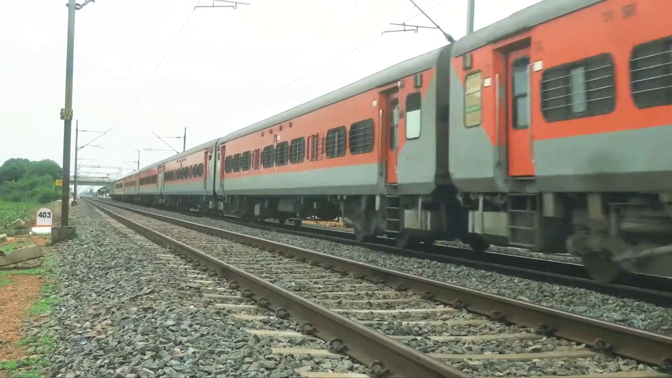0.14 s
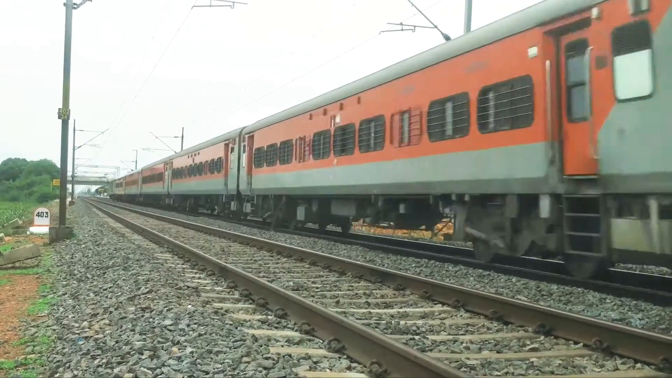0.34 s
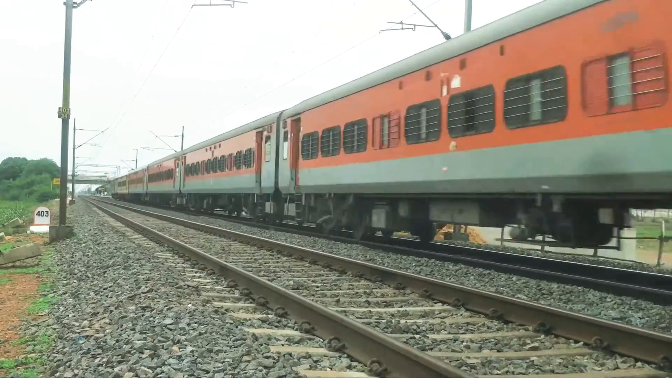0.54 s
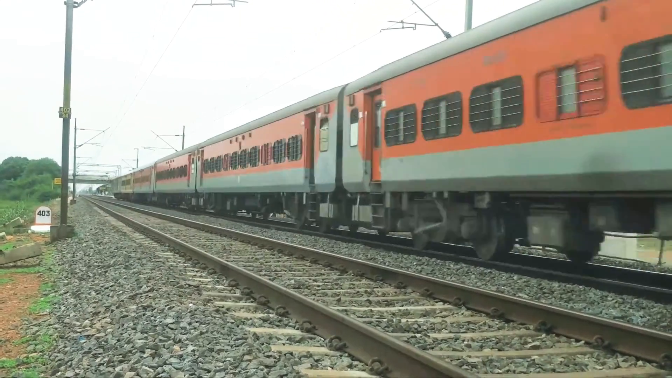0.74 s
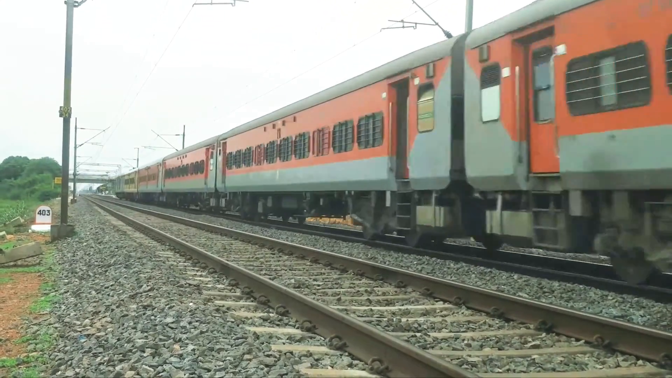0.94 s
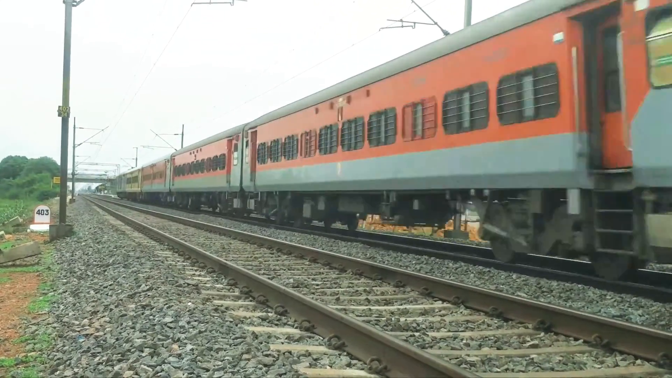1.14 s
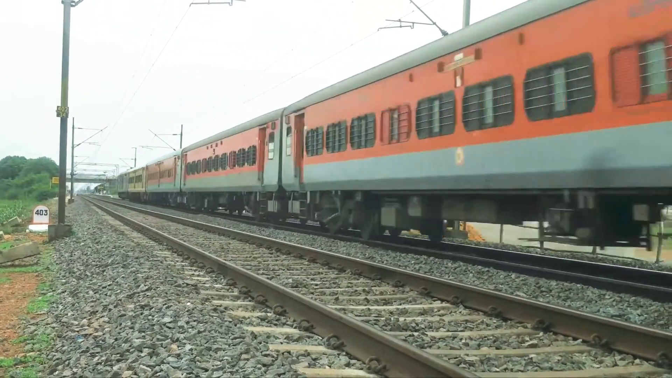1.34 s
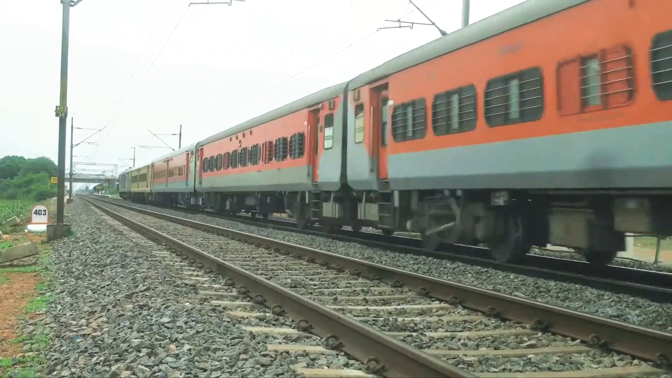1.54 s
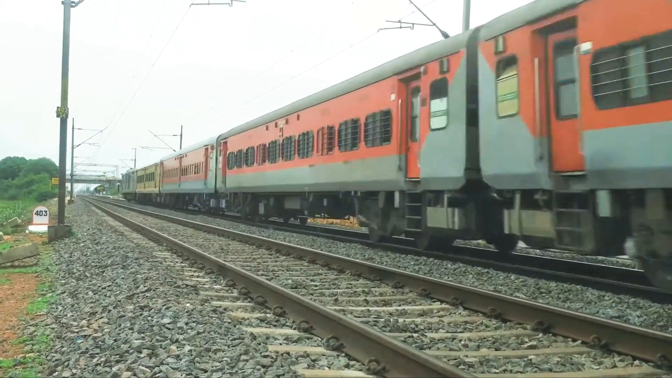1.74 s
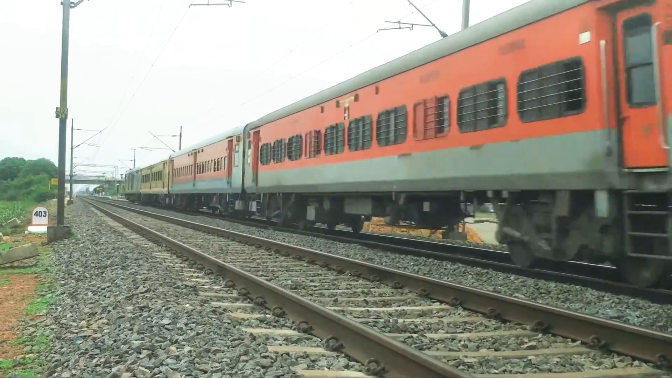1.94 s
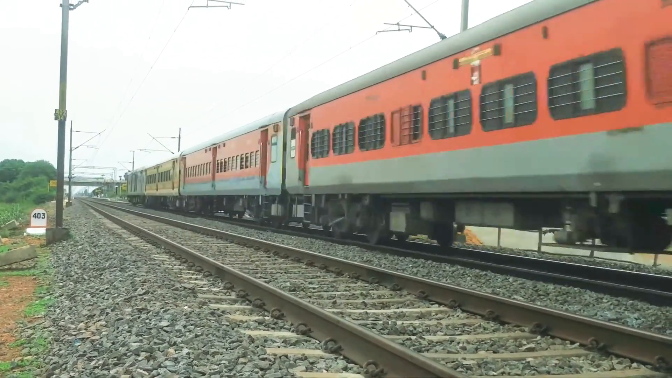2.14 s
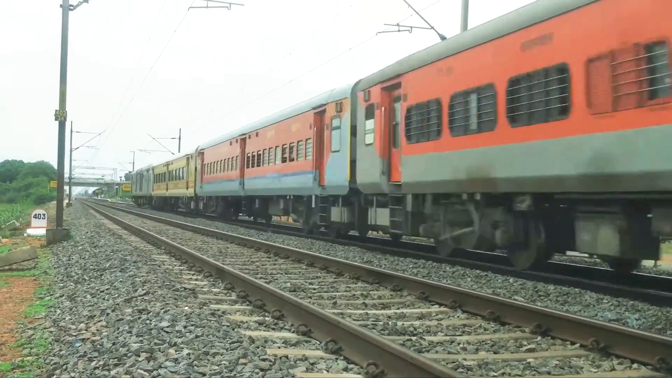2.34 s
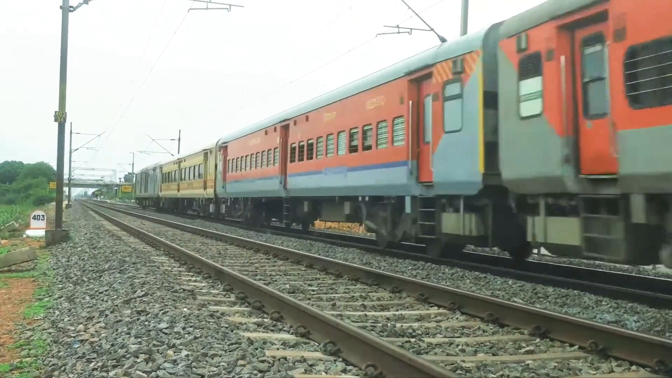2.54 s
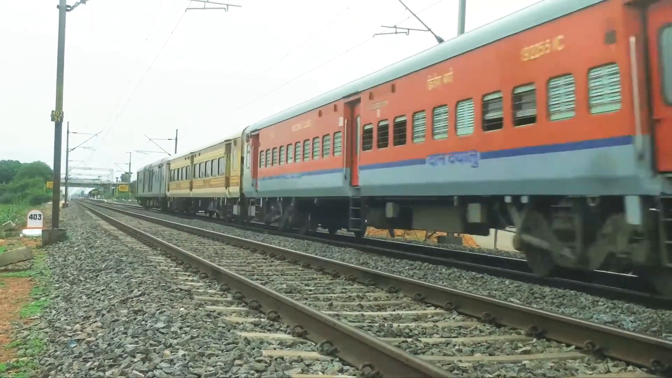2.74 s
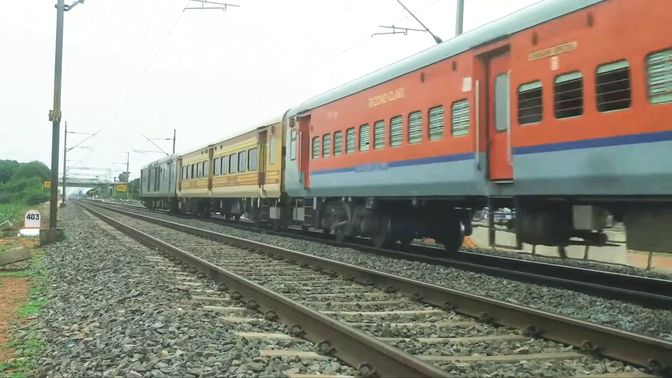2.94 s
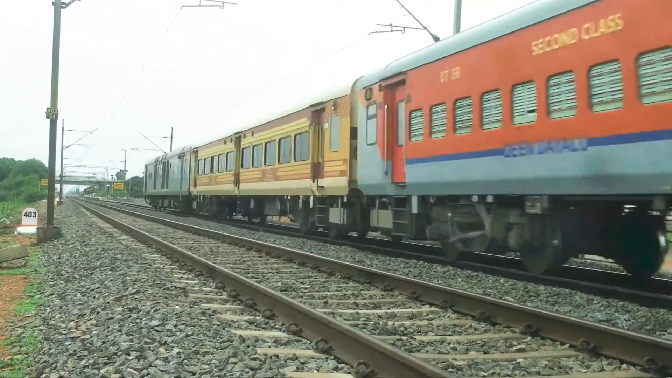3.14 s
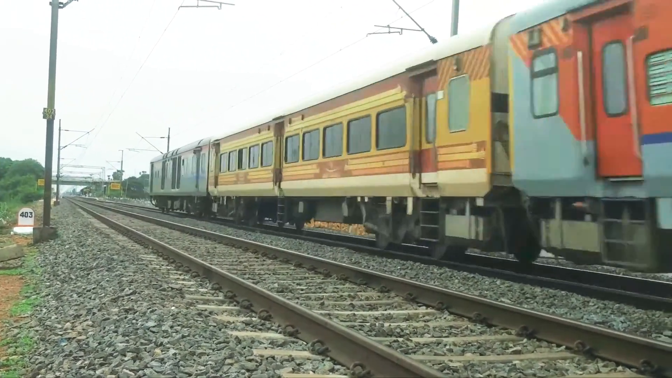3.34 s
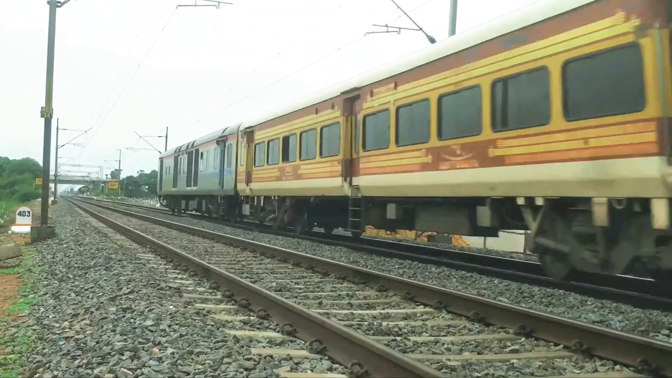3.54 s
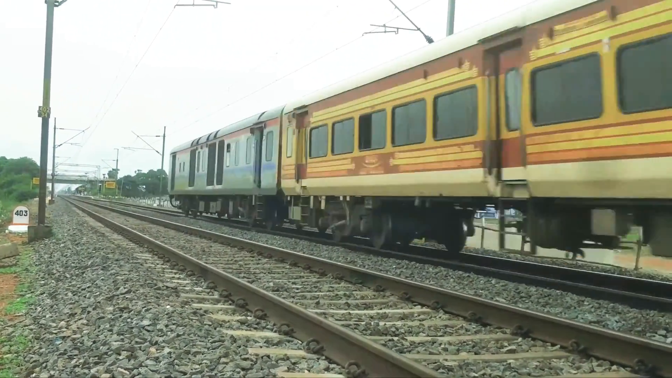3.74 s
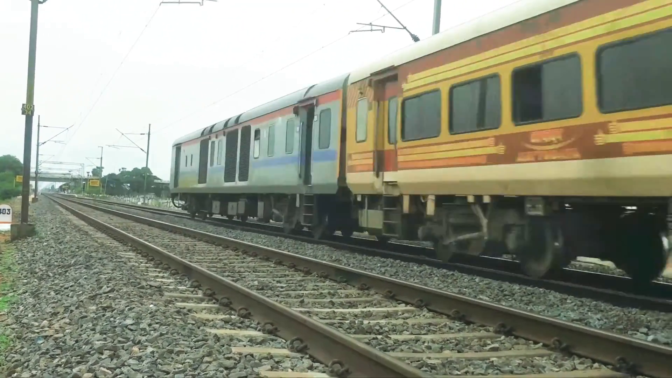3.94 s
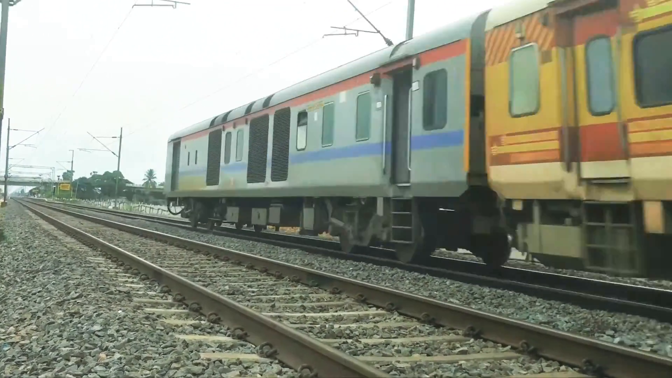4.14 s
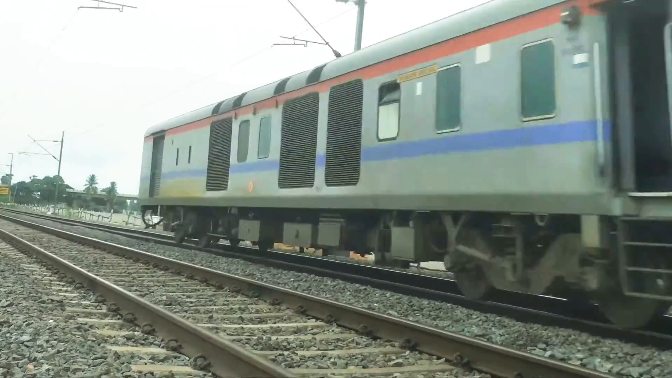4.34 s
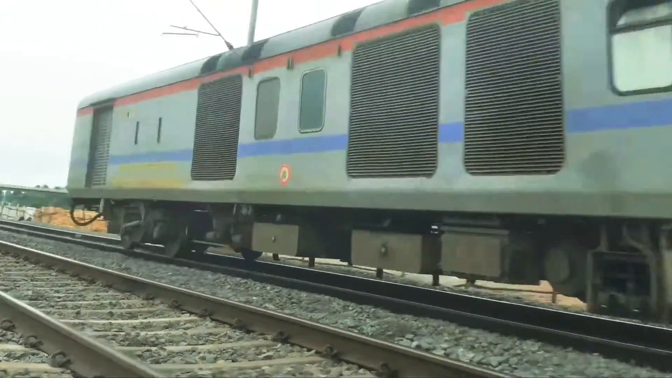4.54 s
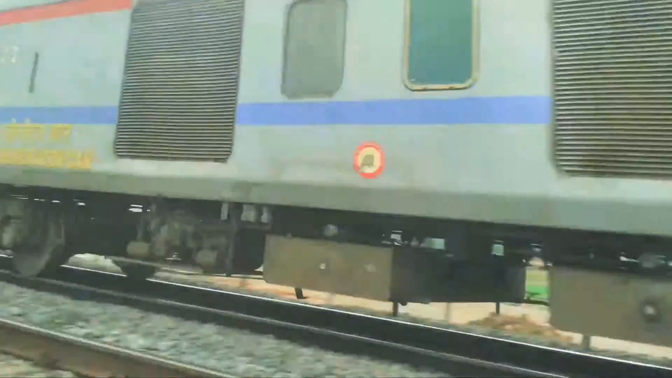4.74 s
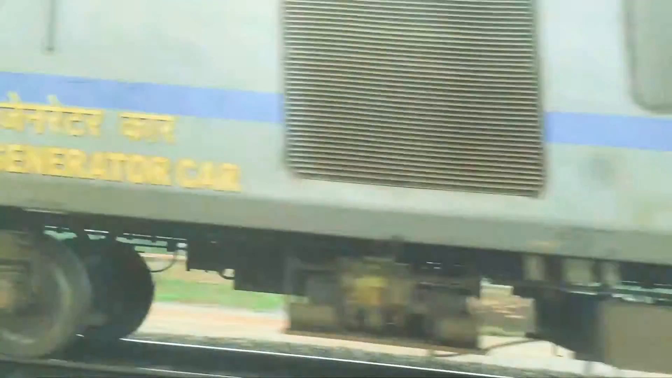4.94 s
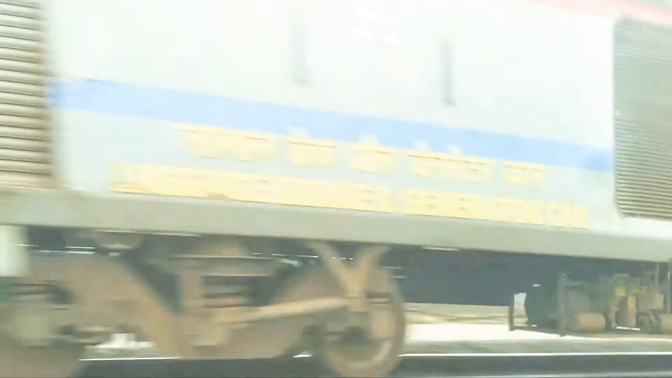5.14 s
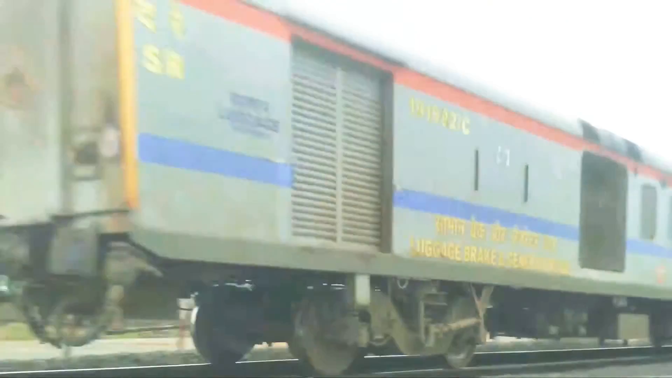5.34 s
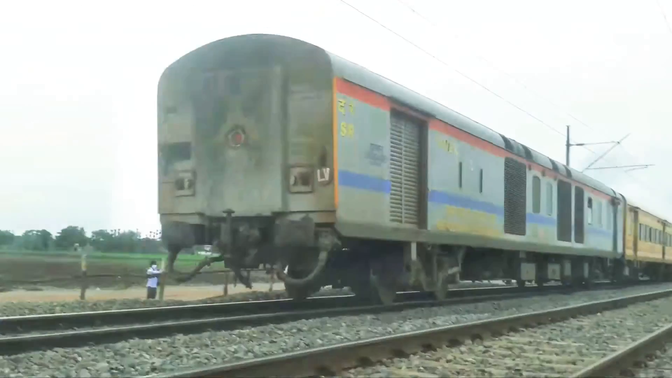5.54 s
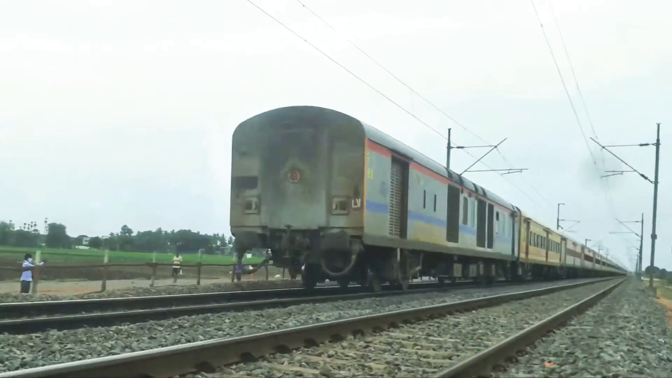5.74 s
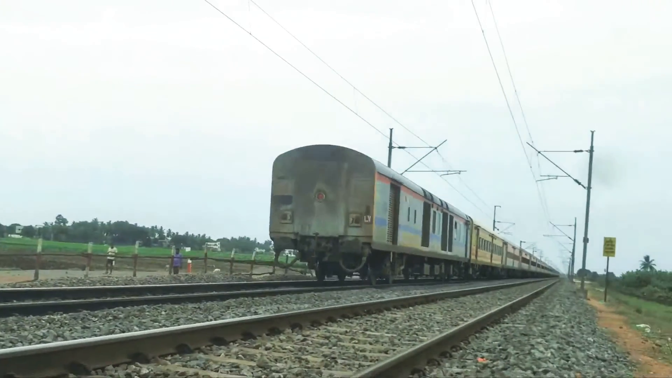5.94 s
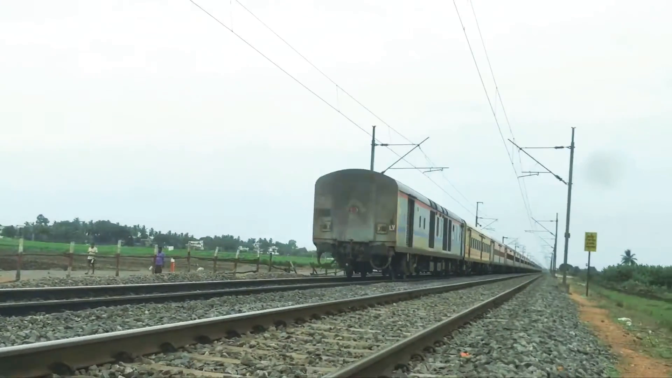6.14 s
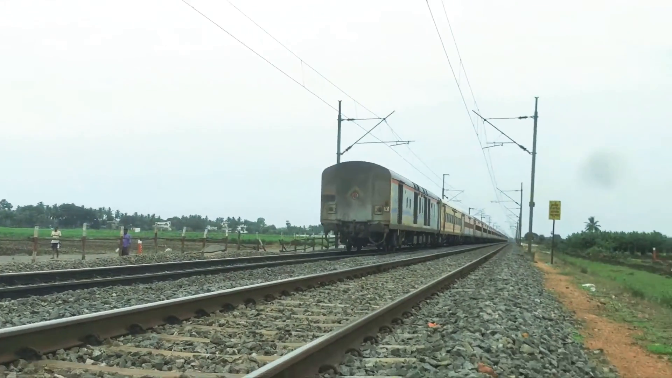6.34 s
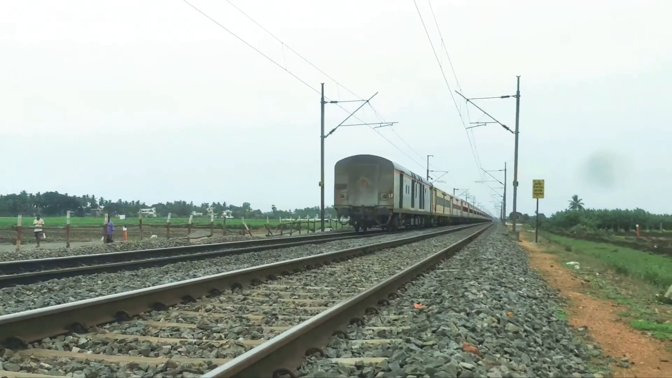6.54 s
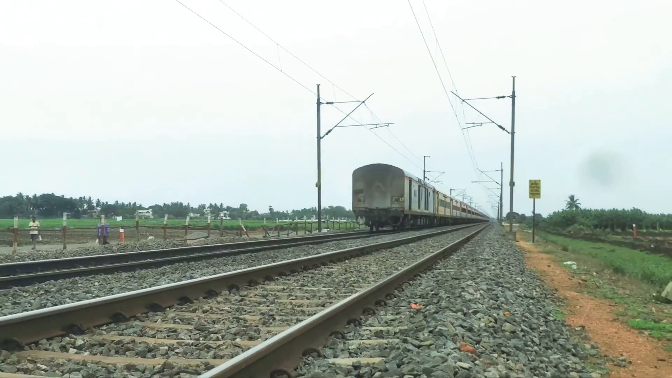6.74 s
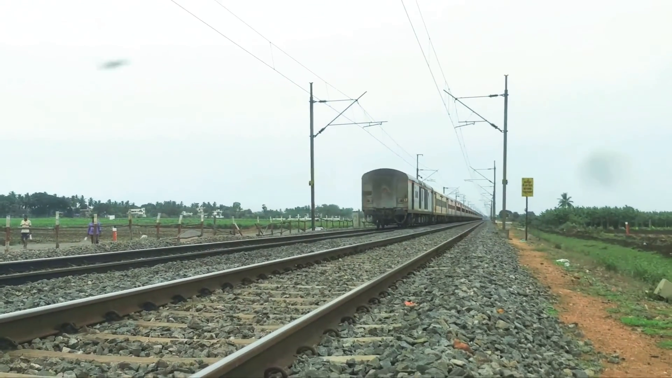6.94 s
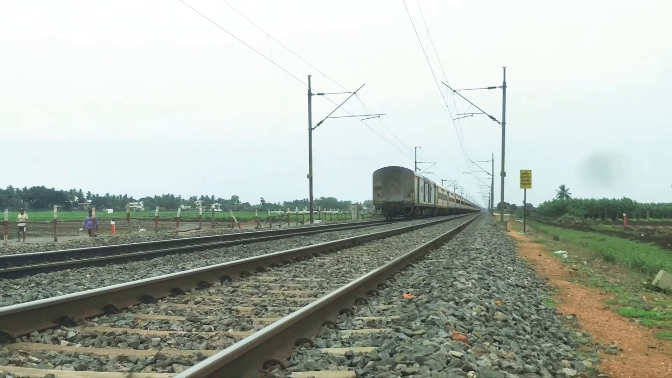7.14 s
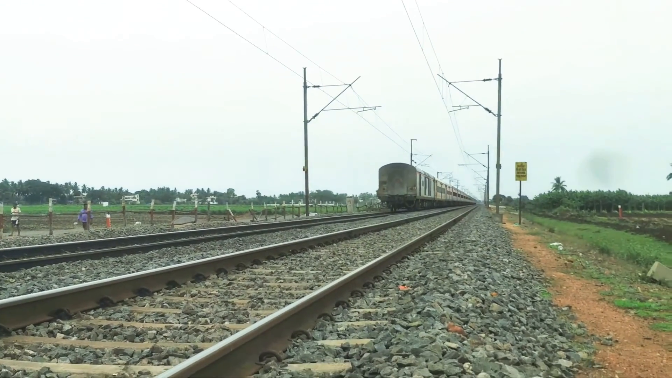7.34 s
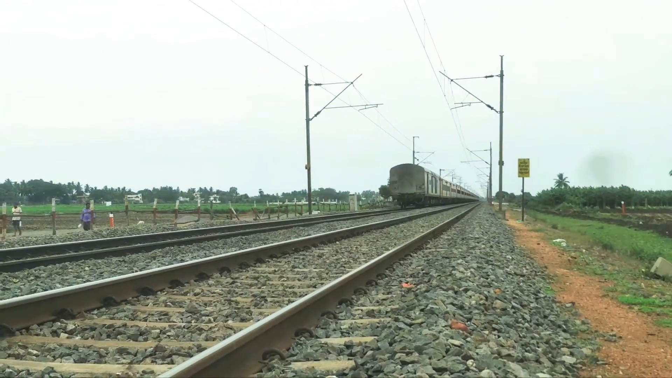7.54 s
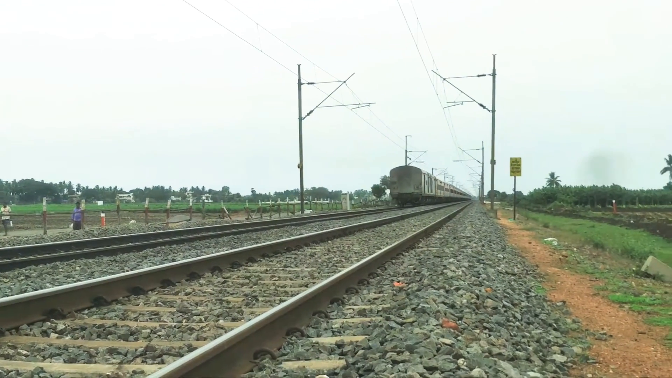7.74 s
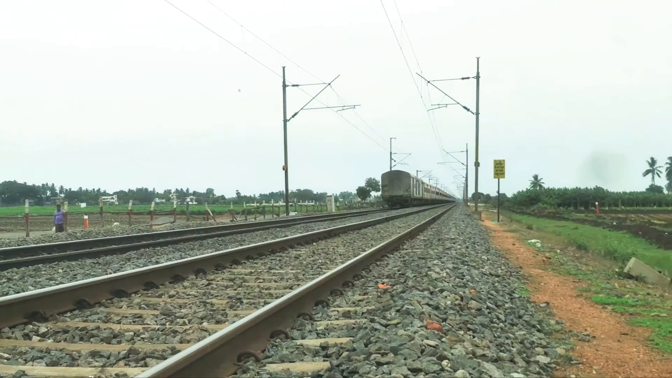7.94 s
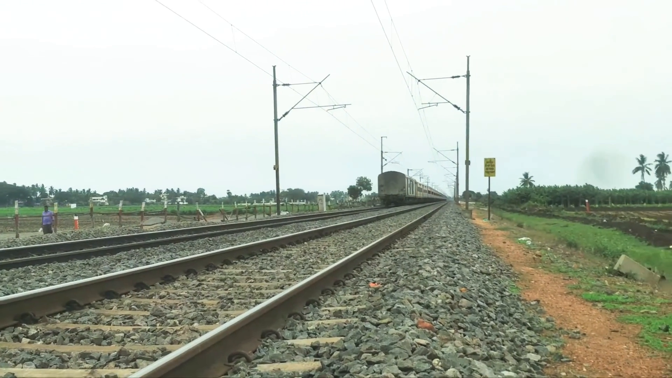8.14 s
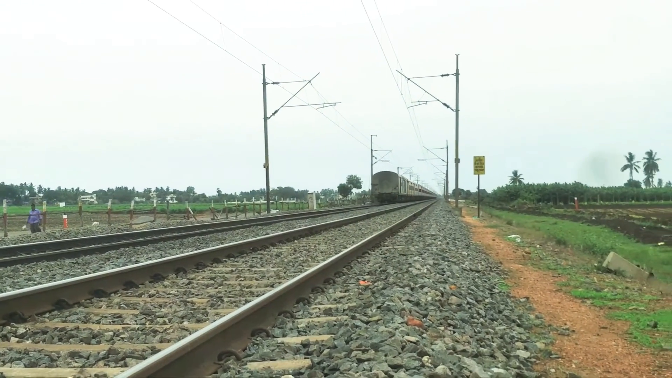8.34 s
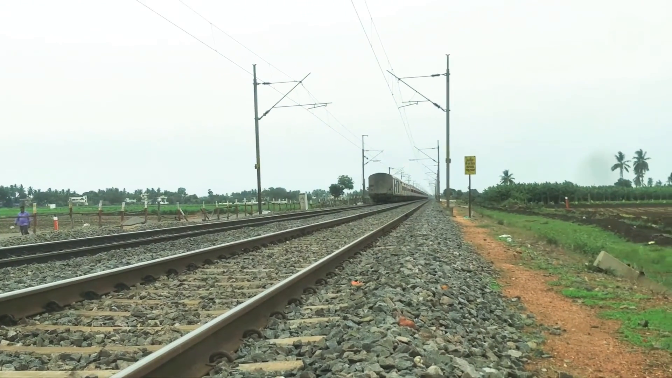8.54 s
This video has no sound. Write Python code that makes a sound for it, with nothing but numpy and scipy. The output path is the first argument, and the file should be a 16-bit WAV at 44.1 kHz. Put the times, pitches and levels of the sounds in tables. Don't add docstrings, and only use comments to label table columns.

```python
import sys
import numpy as np
from scipy import signal
from scipy.fft import rfft, irfft, next_fast_len
from scipy.io import wavfile
from scipy.ndimage import uniform_filter1d, minimum_filter1d

SR = 44100
rng = np.random.default_rng(int(sys.argv[2]) if len(sys.argv) > 2 else 0)


def digitize_waveform(pressure):
    field = np.atleast_2d(pressure).T
    bounded = np.clip(field, -1, 1)
    quanta = np.round(bounded * 32767).astype(np.int16)
    wavfile.write(sys.argv[1], SR, quanta)


def makeup_ratio(level_db):
    decades = np.asarray(level_db, float) / 20
    return 10 ** decades


N = 379241


def unit(x):
    return x / np.sqrt(np.mean(x ** 2) + 1e-20)


def along(points, hz):
    f, v = np.transpose(points)
    return np.interp(np.log(hz + 1), np.log(f + 1), v)


def share_at(points, hz):
    return np.clip(along(points, hz), 0, 1)


def curves(rows):
    s, *cols = np.transpose(rows)
    return [np.interp(np.arange(N) / SR, s, c) for c in cols]


def filtered(x, response):
    n = x.shape[-1]
    m = next_fast_len(n + 8192)
    return irfft(rfft(x, m) * response(np.fft.rfftfreq(m, 1 / SR)), m)[..., :n]


def below(hz, edge_hz):
    return 1 / (1 + (hz / edge_hz) ** 12)


# frequency in Hz, level in dB per Hz.
COLOUR = [(16, -36.5), (28, -38), (45, -16.5), (87, -11), (225, 2), (381, -12.5), (534, -11), (962, -8.5),
          (1290, -19), (1500, -15.5), (1970, -13.5), (2140, -11.5), (2640, -15), (3700, -28), (4290, -28.5),
          (5580, -73), (9440, -120)]
# frequency in Hz, share unlike at the two ports.
SCATTER = [(60, 0.0073), (250, 0.016), (700, 0.21), (1300, 0.25), (2500, 0.7), (5000, 0.85)]
SPLITS = [120, 400, 1300]
# time in seconds, level in dB.
RUMBLE_SINKS = [
    (5.3, 0),
    (6.3, -5.5),
    (8.6, -10),
]
RUMBLE_DB, RUMBLE_FOLLOWS = -22, 0.39
BOOM_LATE_S = .012


def rolling():
    direct = unit(bogies())
    x = filtered(direct, lambda f: np.sqrt(1 - share_at(SCATTER, f)))
    x = x + filtered(rng.standard_normal((2, N)), lambda f: np.sqrt(share_at(SCATTER, f)))
    boom, rail, ring = slaps(width=.02)
    fading = np.interp(np.arange(N) / SR, [5.3, 5.9], [0, -7])
    *roll, air_db = levels()
    rumble = RUMBLE_DB + RUMBLE_FOLLOWS * (roll[0] + 16) + curves(RUMBLE_SINKS)[0]
    knocked, dip = knocks()
    struck, hush = strikes()
    out = knocked + struck
    boom = np.roll(boom, round(BOOM_LATE_S * SR)) + dip
    swells = [0.06 * boom + fading, boom, rail + 0.043 * dip, 0.89 * ring + hush]
    edges = [lambda f: 0 * f] + [lambda f, e=e: below(f, e) for e in SPLITS] + [lambda f: 1 + 0 * f]
    for level, swell, lo, hi in zip([rumble, *roll], swells, edges, edges[1:]):
        band = filtered(x, lambda f: makeup_ratio(along(COLOUR, f)) * np.sqrt(np.abs(hi(f) - lo(f))))
        out = out + makeup_ratio(level + swell) * unit(band)
    out = out + flange_screech(x, ring)
    return out + contact_hiss(direct, x, ring, fading, air_db) + songs(ring)


# frequency in Hz, share the same every turn.
TREAD = [(50, .9), (300, .85), (1000, .5), (3000, .3)]
# frequency in Hz, width in Hz, level in dB.
WHEEL = [(1620, 25, -5.5), (1872, 25, -4), (2221, 11, -1.5), (2540, 6, 1.5), (3166, 50, -2), (3708, 70, -6),
         (4310, 40, -4)]


def treads(turn_hz, size, ring_db):
    n = N + 4 * SR
    loop = np.resize(rng.standard_normal(round(SR / turn_hz)), n)
    both = np.array([loop, rng.standard_normal(n)])

    def mode(f, hz, width, db):
        damping = 1j * f * width
        return makeup_ratio(db) * damping / ((hz / size) ** 2 - f * f + damping)

    def response(f):
        share = share_at(TREAD, f)
        ring = 1 + makeup_ratio(ring_db) * sum(mode(f, *row) for row in WHEEL)
        return np.sqrt([share, 1 - share]) * ring

    return filtered(both, response).sum(0)


# time in seconds, axis from the track normal in degrees.
HEADING = [
    (0, 7.4),
    (4.75, 23.5),
    (5.05, 100),
    (5.4, 116),
    (6, 123),
    (6.6, 127),
    (8.6, 130.7),
]
SPEED, GAP, PORT_S = 31, 7, 0.00052
SOUND = 343


def passing(t, heading, abeam):
    ahead = SPEED * (t - abeam)
    r = np.hypot(ahead, GAP)
    lag = PORT_S * np.cos(0.612 * np.arctan2(ahead, GAP) - np.radians(heading))
    return r, t - r / SOUND + np.outer([-.5, .5], lag)


def port_times(t, heading):
    delay = PORT_S * (1 + np.array([[.5], [-.5]]) * np.cos(np.radians(heading)))
    return np.maximum(t - delay, 0)


# seconds when abeam, sleeper boom in dB, rail in dB, wheel ring in dB, contact hiss in dB.
BOGIES = [(-.3, 0, -24, -16.5, -22), (0, -25, -61, -20.5, -36), (.33, -19.5, -24, -19.5, -53),
          (.62, -14.5, -22.5, -17, -35.5), (.9, -17, -42, -24.5, -57), (1.4, -16.5, -21.5, -19, -40),
          (1.75, -12, -19.5, -19.5, -36.5), (2.05, -15.5, -27, -18, -33.5), (2.25, -12.5, -23, -22, -37.5),
          (2.75, -26.5, -28.5, -21, -43.5), (3.2, -22.5, -28, -20.5, -41.5), (3.5, -20, -24, -20, -38),
          (3.85, -18, -29.5, -17.5, -38.5), (4.4, -14, -19.5, -17, -33.5), (4.78, -11, -22, -16.5, -32.5),
          (5.08, -14, -19.5, -16.5, -26.5), (5.33, -15.5, -30, -21.5, -36.5),
          (5.72, -34.5, -32, -40, -64.5)]


def bogies():
    t, (heading,) = np.arange(N) / SR, curves(HEADING)
    pool = [treads(hz, size, ring_db=13) for hz, size in [(10.75, 1), (10.9, .96), (10.65, 1.05)]]
    total, power = np.zeros((2, N)), np.zeros(N)
    for k, (s, _, _, db, _) in enumerate(BOGIES):
        r, sent = passing(t, heading, s)
        source = pool[k % len(pool)]
        gain = makeup_ratio(db) / r ** 1.095
        start_s = 1 + 2 * rng.random()
        total += gain * np.interp((sent + start_s) * SR, np.arange(len(source)), source)
        power += gain ** 2
    return total / np.sqrt(power)


def nearness(times, levels_db, fall):
    t = np.arange(0, N, 64) / SR
    r = np.hypot(SPEED * (t[:, None] - times), GAP)
    power = (makeup_ratio(levels_db) * (GAP / r) ** fall) ** 2
    return np.interp(np.arange(N) / SR, t, 10 * np.log10(power.sum(1)))


# fall with distance as a power, whole train far off in dB,
# its fade in dB per second, share of the drone's swells.
CARRY = [
    (1.8, -41.5, -1.1, 0.45),
    (1.8, -39.5, 2, 0.76),
    (2.2, -35, 1.98, 1.4),
    (2.2, -53, 2.5, 1.3),
]
# time in seconds, level in dB.
DRONE = [(6, -0.5), (6.85, 0), (7.08, 2), (7.3, 0.5), (7.62, 3), (7.76, 0), (8.6, -0.5)]
FAR_S = 6.5


def levels():
    t, (s, *columns) = np.arange(N) / SR, np.transpose(BOGIES)
    drone, out = curves(DRONE)[0], []
    for db, (fall, far_db, fade, share) in zip(columns, CARRY):
        far = far_db - fade * (t - FAR_S) + share * drone
        out.append(10 * np.log10(makeup_ratio(2 * nearness(s, db, fall)) + makeup_ratio(2 * far)))
    return out


# first slap in seconds, last in seconds, swells of boom, rail, ring in dB.
SLAPS = [(0.118, 0.203, -0.5, 0.5, 2.5), (0.293, 0.385, 1, 2, 2), (0.459, 0.739, 3.5, 2, 2),
         (0.857, 1.038, 8, 5.5, -1), (1.3, 1.387, 0.5, 3.5, 3.5), (1.481, 1.749, 3, 4, 3.5),
         (1.836, 2.189, 6.5, 8, 3.5), (2.287, 2.376, -0.5, 4.5, 2.5), (2.741, 2.854, -2.5, 0.5, 2),
         (2.91, 3.082, 3, 2, 2), (3.254, 3.337, -3.5, 5, 3), (3.43, 3.889, 3.5, 2.5, 0.5),
         (4.014, 4.216, 2.5, 0, 2), (4.398, 4.491, -5.5, 6, 3), (4.57, 4.85, 1, 6, 1.5),
         (4.944, 5.12, 0, 4, 3), (5.343, 5.514, 6, 6.5, 2), (5.72, 5.919, 2, -0.5, 3),
         (6.35, 7.032, 1.5, 2, 0.5), (7.248, 7.469, 2, 0.5, -1), (7.767, 7.956, 0.5, 4, 1),
         (8.27, 8.46, 2, -1, 1.5)]
TURN_S, TURN_AWAY_S, GONE_S = .092, .1, 6
SLAP_SCATTER_DB = .7


def slaps(width):
    marks = np.zeros((3, N))
    for first, last, *swell in SLAPS:
        turn = TURN_S if first < GONE_S else TURN_AWAY_S
        when = np.linspace(first, last, round((last - first) / turn) + 1)
        heights = swell + SLAP_SCATTER_DB * rng.standard_normal((len(when), len(swell)))
        marks[:, np.round(when * SR).astype(int)] = heights.T
    t = np.arange(-SR // 10, SR // 10) / SR
    hump = np.exp(-.5 * (t / np.where(t < 0, 0.4 * width, width)) ** 2)
    swell = signal.fftconvolve(marks, hump[None], mode="same", axes=1)
    return 1.48 * (swell - uniform_filter1d(swell, SR // 5, axis=1))


# time in seconds, peak in dB, sleeper pitch in Hz.
KNOCKS = [(0.026, -15, 229), (0.091, -3.5, 197), (0.12, -5, 187), (0.186, -3.5, 171), (0.325, -1, 148),
          (0.593, -1, 196), (0.638, -19, 147), (0.736, -5, 130), (0.833, -6.5, 160), (0.869, -4, 157),
          (0.962, -2, 213), (1.062, -5, 200), (1.233, -5, 186), (1.282, -6, 228), (1.472, 0, 220),
          (1.655, -1, 194), (1.752, -2, 216), (1.808, -2, 210), (1.845, -3, 285), (1.898, -3.5, 196),
          (1.989, -2.5, 195), (2.076, -11, 149), (2.197, -6, 155), (2.274, -2.5, 180), (2.372, -6, 203),
          (2.515, -5, 172), (2.579, -8, 252), (2.67, -13.5, 262), (3.247, -7, 205), (3.447, -6.5, 183),
          (3.517, -5, 248), (3.796, -4.5, 206), (3.828, -5, 178), (3.87, -4.5, 127), (4.016, -12, 155),
          (4.083, -7.5, 184), (4.287, -3.5, 250), (4.318, -4, 304), (4.367, -1.5, 252), (4.455, 0, 230),
          (4.545, -3.5, 177), (4.577, -1, 238), (4.633, 0.5, 220), (4.726, -8, 231), (4.823, -2.5, 232),
          (4.86, 3, 214), (5.023, -6, 153), (5.1, -11, 195), (5.211, -5, 165), (5.43, -6, 218),
          (5.5, -8, 163), (5.596, -7.5, 162)]
KNOCK_DB, KNOCK_RISE_S, KNOCK_T60_S = 2.5, 0.0017, 0.056
UPPER, UPPER_DB = 1.56, -9.5
LIFT_DB, LIFT_S, LIFT_LEAD_S = 10, .016, .007


def knocks():
    out, dip, (heading,) = np.zeros((2, N + SR)), np.zeros(N), curves(HEADING)
    t = np.arange(SR // 8) / SR
    for s, db, hz in KNOCKS:
        at = round(s * SR)
        u = port_times(t, heading[at])
        envelope = makeup_ratio(db + KNOCK_DB - 60 * u / KNOCK_T60_S) * (1 - np.exp(-u / KNOCK_RISE_S))
        upper = makeup_ratio(UPPER_DB) * np.sin(2 * np.pi * UPPER * hz * u)
        out[:, at:at + len(t)] += envelope * (np.sin(2 * np.pi * hz * u) + upper)
        near = np.arange(max(at - SR // 16, 0), at + SR // 16)
        dip[near] -= LIFT_DB * np.exp(-.5 * ((near / SR - s + LIFT_LEAD_S) / LIFT_S) ** 2)
    return out[:, :N], dip


# time in seconds, peak in dB, loudest wheel mode in Hz.
STRIKES = [(0.0927, 0, 2153), (0.1875, -6, 2210), (0.2204, -5, 1980), (0.2862, -1.5, 2210),
           (0.3182, -6.5, 2410), (0.4549, 0.5, 2344), (0.5087, -2.5, 2130), (0.5487, -1.5, 1483),
           (0.6404, -4.5, 2020), (0.7387, -4.5, 2030), (0.9607, -10, 1660), (1.1897, -8, 1860),
           (1.3857, -6, 1924), (1.4641, -5, 2230), (1.5594, -2.5, 2150), (1.7355, -12, 1900),
           (1.8332, -13, 1900), (1.925, -4.5, 2230), (2.0108, -9, 2040), (2.1051, -3, 2040),
           (2.1799, -4, 2320), (2.2164, -16, 2130), (2.2977, -3.5, 2070), (2.3565, -7, 1590),
           (2.7342, -24, 2400), (2.8245, -12.5, 1800), (2.9228, -5.5, 2080), (3.044, -7, 2050),
           (3.1014, -11, 1850), (3.2136, -11, 2155), (3.3348, -14, 1930), (3.4037, -13, 1860),
           (3.4236, -13, 2340), (3.6067, -6.5, 1743), (3.6995, -3.5, 2100), (3.9794, -5, 2070),
           (4.0367, -5, 2200), (4.1579, -6, 1833), (4.3131, -6, 1730), (4.341, -13, 1880),
           (4.368, -7, 2320), (4.3894, -24, 2100), (4.4184, -3, 2075), (4.4643, -6, 1800),
           (4.579, -8, 2180), (4.6628, -9, 2370), (4.6957, -3, 2110), (4.7296, -10, 2250),
           (4.806, -5, 1910), (4.8479, -4, 1890), (4.9397, 4, 1616), (5.0215, -2, 1570),
           (5.1128, -21, 2110), (5.2116, -7, 3200)]
# time in seconds, peak in dB, pitch in Hz.
RAPS = [(0.094, -12.5, 432), (0.32, -8.5, 540), (0.369, -13, 423), (0.42, -17, 560), (0.591, -10.5, 600),
        (0.688, -19, 490), (0.741, -10.5, 510), (0.838, -6, 438), (0.968, -15, 520), (1.307, -14, 931),
        (1.386, -2, 656), (1.47, -15, 649), (1.559, -15, 490), (1.904, -11.5, 610), (2.086, -10, 440),
        (2.185, -17, 423), (2.276, -9, 460), (3.25, -16, 424), (3.423, -13.5, 432), (4.192, -14, 603),
        (4.373, -16, 670), (4.46, -7, 815), (4.548, -13, 750), (4.85, -10, 417), (4.92, -9.5, 645),
        (5.022, -6, 724), (5.35, -13, 576), (5.404, -11.5, 564)]
# time in seconds, level in dB, pitch in Hz.
PINGS = [(.225, -16.5, 1440), (0.361, -15, 1854), (.395, -13, 2160), (0.51, -22.5, 4240), (0.83, -29, 4000),
         (.89, -20.5, 3710), (.9, -20, 1716), (2.415, -15, 2170), (2.46, -22.5, 3400), (2.458, -20, 1600),
         (2.46, -27, 4300), (2.725, -19, 1844), (3.1, -26, 2400), (5.26, -26, 2870), (3.4, -24, 1510),
         (2.3, -13, 2200), (1.93, -13, 1500), (1.7, -22, 3350), (1.26, -21, 2150), (1.98, -26, 3100),
         (1.9, -21, 2500), (3.84, -26, 2400),
         (0.0071, -17, 2400), (.09, -33, 3930), (0.12, -25.5, 3760), (0.081, -22, 3330), (0.11, -16, 2400),
          (.185, -25, 3810), (0.37, -26.5, 3900), (0.43, -19, 3000), (0.35, -17, 3000), (0.581, -17, 2400),
          (0.5, -26, 4400), (.005, -11, 2150), (0.1, -14, 2150), (0.038, -13, 2350), (2.07, -26, 2200),
          (2.3, -9, 3140), (2.17, -26, 3590), (2.169, -18, 3050), (2.68, -23, 2430), (3, -27, 1800),
          (5.03, -16, 2180), (5.32, -25, 1600), (5.21, -12.5, 3120), (5.3, -20, 2920), (1.96, -14.5, 2180)]
STRIKE_DB, STRIKE_T60_S, SIDE_MODES_DB = -9, 0.12, -7
RAP_DB, RAP_T60_S, PING_T60_S = -3, .07, 0.3
HUSH_DB, HUSH_S = 2, 0.012
SAG = 0.153


def strikes():
    out, dip, (heading,) = np.zeros((2, N + SR)), np.zeros(N), curves(HEADING)
    t = np.arange(SR // 5) / SR
    blows = [(s, db + STRIKE_DB, hz, STRIKE_T60_S, SIDE_MODES_DB) for s, db, hz in STRIKES]
    blows += [(s, db + RAP_DB, hz, RAP_T60_S, SIDE_MODES_DB) for s, db, hz in RAPS]
    blows += [(s, db, hz, PING_T60_S, -28) for s, db, hz in PINGS]
    for s, db, hz, t60, side_db in blows:
        at = round(s * SR)
        u = port_times(t, heading[at])
        others = (1450 if hz > SPLITS[2] else 420) * 2.7 ** rng.random(6)
        modes = [(hz, 0)] + [(f, side_db - 24 * np.log2(max(f / 2400, 1))) for f in others]
        ring = sum(makeup_ratio(level) * np.sin(2 * np.pi * f * u * (1 - SAG * u)) for f, level in modes)
        out[:, at:at + len(t)] += makeup_ratio(db - 60 * u / t60) * (1 - np.exp(-u / 0.00092)) * ring
        if t60 == STRIKE_T60_S:
            near = np.arange(max(at - SR // 16, 0), at + SR // 16)
            dip[near] -= HUSH_DB * np.exp(-.5 * ((near / SR - s + HUSH_S / 2) / HUSH_S) ** 2)
    return out[:, :N], dip


# seconds when abeam, pitch at rest in Hz, level in dB, beam narrowness as a power.
SONGS = [(4.16, 81, -15, 3.5), (2.15, 100, -17, 2), (4.6, 103, -19, 2), (5.0, 102.7, -17, 2.5),
         (1.97, 2240, -19, 3.5), (5.26, 3010, -25, 30), (0.449, 196, -26, 2.2), (1.55, 222.5, -26, 4),
         (4.48, 232, -17, 5), (5.36, 220, -17, 8), (.12, 3350, -29, 5), (0.052, 2105, -22, 3),
         (0.33, 2430, -25, 5), (0.48, 2200, -23, 4), (0.72, 2400, -29, 4), (0.9, 1700, -28, 6.1),
         (1.3, 2135, -25, 3.6), (1.77, 2450, -28, 7), (2.1, 2300, -27, 3), (2.74, 2390, -25, 7),
         (2.76, 2130, -27, 7), (3.85, 2120, -24, 2), (3.75, 1800, -26, 2), (4.45, 2100, -29, 4.1),
         (4.93, 1640, -27, 4), (5.1, 1530, -27, 4.5), (5.2, 2113, -42, .27), (3.25, 3590, -35, 12),
         (5.55, 442, -30, 1.1), (5.3, 675, -33, 1.6)]


def songs(swell_db):
    out, (heading,) = np.zeros((2, N)), curves(HEADING)
    for s, hz, db, beam in SONGS:
        part = slice(max(0, round((s - 1) * SR)), min(N, round((s + 3 / beam) * SR)))
        t = np.arange(N)[part] / SR
        r, sent = passing(t, heading[part], s)
        rate = 3 + hz / 60
        knots = rng.standard_normal((2, 500))
        size, drift = [np.interp((t - t[0]) * rate, np.arange(knots.shape[1]), k) for k in knots]
        broken = np.clip(hz / 400, 1, 5) * size + np.clip(hz / 600, 0, 2.5) * swell_db[part]
        tone = np.sin(2 * np.pi * hz * sent + 1.1 * drift)
        out[:, part] += makeup_ratio(db - 1.5 + broken) * (GAP / r) ** beam * tone
    return out


# time in seconds, level in dB.
SCREECH = [
    (5.0, -60),
    (5.17, -35),
    (5.24, -24),
    (5.4, -33),
    (5.9, -44),
    (8.6, -55),
]


def flange_screech(x, ring):
    screech = unit(filtered(x, lambda f: below(f, 3270) * (1 - below(f, 2980))))
    return makeup_ratio(curves(SCREECH)[0] + 0.43 * ring) * screech * (np.arange(N) / SR > 5)


# frequency in Hz, level in dB per Hz.
HISS = [(3800, -29), (4400, -1), (5000, -1), (6500, -6), (8000, -14), (10000, -18), (12600, -19),
        (14300, -32), (16000, -58)]
# seconds when abeam, level in dB.
SPRAYS = [(0, -40), (.35, -47), (.7, -51), (1.4, -44), (1.9, -38), (2.75, -55), (3.38, -42.5), (3.901, -47),
          (4.5, -39.5), (4.8, -42), (5.07, -37.5), (5.3, -53), (5.78, -52), (6.3, -56), (7.0, -54),
          (7.5, -52)]
FIZZ_HZ, SPRAY_FALL = 8000, 1.35


def contact_hiss(direct, x, ring, fading, air_db):
    fizz_db = nearness(*np.transpose(SPRAYS), SPRAY_FALL) - air_db
    air = 0.35 * direct + rng.standard_normal((2, N))
    hiss = unit(filtered(air, lambda f: makeup_ratio(along(HISS, f)) * np.sqrt(below(f, FIZZ_HZ))))
    fizz = unit(filtered(air, lambda f: makeup_ratio(along(HISS, f)) * np.sqrt(1 - below(f, FIZZ_HZ))))
    foot = unit(filtered(x, lambda f: below(f, 3950) * (1 - below(f, 3320))))
    total = hiss + makeup_ratio(fizz_db - 9.0) * fizz + makeup_ratio(-0.12 * fading) * foot
    return makeup_ratio(air_db - 1.0 + 0.24 * ring) * total


# time in seconds, turns made.
TURNS = [(5.383, 0), (5.985, 6), (6.49, 11), (7.5, 21), (8.41, 30), (8.61, 32)]
# part of a turn, level near in dB, level far in dB.
FLATS = [
    (.195, -4, -2.5),
    (.52, 2, 1),
    (0.722, -3.5, 6),
]
# time in seconds, level in dB.
THUMP = [
    (5.4, -29.5),
    (8.26, -43),
    (8.6, -40.5),
]


def last_axle(thud_hz, short):
    s, turns = np.transpose(TURNS)
    blows = np.zeros(N + SR)
    for part, near_db, far_db in FLATS:
        when = np.interp(np.arange(32) + part, turns, s)
        db = np.interp(when, [6, 7.6], [near_db, far_db]) + rng.normal(0, 1.7, len(when))
        blows[np.round(when * SR).astype(int)] = makeup_ratio(db)
    t = np.arange(-SR // 20, SR // 20 + 1) / SR
    push = -np.cos(2 * np.pi * thud_hz * t) * np.exp(-.5 * (t / short) ** 2)
    x = signal.fftconvolve(blows, push - push.mean(), mode="same")[:N]
    fade_in = np.clip((np.arange(N) / SR - 5.35) / 0.045, 0, 1)
    return fade_in * makeup_ratio(curves(THUMP)[0] + 1.5) * unit(x)


# time in seconds, level in dB, pitch in Hz, t60 in seconds.
CLANKS = [(5.022, -21, 2600, 0.034), (7.39, -44, 1000, .12), (7.616, -27, 1950, 0.031),
          (3.607, -17, 2060, 0.047), (8.15, -49, 760, .1)]


def couplings():
    clanks, t = np.zeros(N + SR), np.arange(SR // 4) / SR
    for s, db, hz, t60 in CLANKS:
        pitches = hz * (1 + 0.06 * rng.standard_normal((6, 1)))
        ring = np.sin(2 * np.pi * pitches * t).sum(0) * (1 - np.exp(-t / .001))
        clanks[round(s * SR):][:len(t)] += makeup_ratio(db - 60 * t / t60) * ring
    return clanks[:N] * makeup_ratio([[1], [-1]])


# time in seconds, level in dB, length in seconds.
PUFFS = [(5.83, -72, .04), (5.97, -68, .03), (6.223, -58.5, 0.022), (6.62, -75, 0.018), (6.7, -62, .015),
         (6.92, -73, .02), (7.02, -64, 0.026), (7.3, -73, .02), (7.39, -59, .02), (7.48, -70, .018),
         (7.6, -74, .03)]
# frequency in Hz, level in dB per Hz.
PUFF = [(3000, -30), (6500, -7), (8000, -2), (9500, -17), (11000, -2), (13000, -4.5), (14300, -2),
        (15300, -31)]


def puffs():
    t = np.arange(N) / SR
    swell = sum(makeup_ratio(db) * np.exp(-.5 * ((t - s) / length) ** 2) for s, db, length in PUFFS)
    return swell * unit(filtered(rng.standard_normal((2, N)), lambda f: makeup_ratio(along(PUFF, f))))


# frequency in Hz, rms level in dB.
FAR_RINGS = [(931.3, -59), (1922, -53.5), (2078, -54), (2396, -57), (3031, -59)]


def far_rings(width_hz):
    t, out = np.arange(N) / SR, 0
    for hz, db in FAR_RINGS:
        line = filtered(rng.standard_normal(N), lambda f: 1 / (1 + ((f - hz) / width_hz) ** 2))
        out = out + makeup_ratio(db + 1.0) * unit(line)
    return out * np.clip((t - 5.5) / .6, 0, 1)


# multiple of the pitch, level in dB.
HORN = [(1, -41), (2, -46), (3, -40.5), (4, -47), (6, -62), (7, -59)]
# time in seconds, level in dB.
HORN_SWELL = [
    (8.14, -32),
    (8.24, -4),
    (8.6, -6.5),
]


def horn(pitch_hz):
    t = np.arange(N) / SR
    tone = sum(makeup_ratio(db + 3.0) * np.sin(2 * np.pi * (k * pitch_hz * t + rng.random())) for k, db in HORN)
    return tone * makeup_ratio(curves(HORN_SWELL)[0]) * (t > 8.1)


LIMIT, LIMIT_S = 1.04, .004


def limited(x):
    need, span = np.minimum(1, LIMIT / (np.abs(x).max(0) + 1e-9)), round(LIMIT_S * SR)
    return x * uniform_filter1d(minimum_filter1d(need, size=2 * span), size=span)


# frequency in Hz, power kept only above this part of its surroundings.
SPARSE = [(4400, 0), (4650, .65), (7000, 1.5), (13000, 1.6)]


def thinned(x):
    hz, _, z = signal.stft(x, SR, nperseg=2048)
    power = np.mean(np.abs(z) ** 2, axis=0, keepdims=True)
    around = uniform_filter1d(uniform_filter1d(power, size=70, axis=1), size=11, axis=2)
    patch = uniform_filter1d(power, size=14, axis=1)
    need = along(SPARSE, hz)[:, None] * around
    kept = z * (power >= need) * (patch >= .55 * need)
    return signal.istft(kept, SR, nperseg=2048)[1][:, :N]


# time in seconds, peak in dB.
TICKS = [(0.0014, -22), (0.0354, -28), (0.0934, -34), (0.1254, -29), (0.1394, -33), (0.2854, -29),
         (0.3864, -40), (0.456, -27.5), (0.4864, -33), (0.5477, -32), (0.6419, -27), (0.7392, -28),
         (1.5599, -34.5), (1.6644, -44), (1.6786, -38), (1.7449, -30), (1.8354, -40.5), (2.105, -33),
         (2.2024, -32), (2.3017, -32), (3.4311, -41), (4.3744, -41), (4.4624, -31), (4.5794, -28),
         (4.7734, -34), (4.9374, -32), (4.951, -30), (5.023, -28), (5.04, -26), (5.05, -31), (5.215, -41),
         (5.3294, -38)]


def crackle():
    ticks, t = np.zeros((2, N + SR)), np.arange(SR // 40) / SR
    for s, db in TICKS:
        spit = makeup_ratio(db + 1.5 - 60 * t / 0.011) * rng.standard_normal((2, len(t)))
        ticks[:, round(s * SR):][:, :len(t)] += spit
    band = lambda f: (1 - below(f, 5500)) * below(f, 15500) * (8000 / (f + 1)) ** 2.7
    return filtered(ticks[:, :N], lambda f: band(f) * makeup_ratio([[-1.5], [1.5]]))


def scene():
    train = rolling() + last_axle(thud_hz=73, short=0.01) + couplings()
    return train + puffs() + far_rings(width_hz=9.6) + horn(pitch_hz=272.6)


def band_limit(x):
    return signal.sosfilt(signal.butter(12, 16000, fs=SR, output="sos"), x)


# frequency in Hz, left minus right in dB, left lead in radians.
PORTS = [(60, -0.1, 0.07), (340, -0.5, 0.29), (750, 0.5, 0.41), (1130, 2.5, -0.13), (1550, 3, 0.22),
         (2300, 2.5, -0.13), (3600, -3.5, -0.68), (12000, -3.5, -0.6)]


def record(dry):
    hz, db, lead = np.transpose(PORTS)
    half = lambda v, f: np.outer([.5, -.5], along(np.transpose([hz, v]), f))
    x = filtered(dry, lambda f: makeup_ratio(half(db, f)) * np.exp(1j * half(lead, f)))
    x = thinned(limited(x)) + crackle()
    x = x / (1 + np.abs(x / 1.02) ** 24) ** (1 / 24)
    return band_limit(x)


dry = scene()
out = record(dry)
digitize_waveform(out)
```